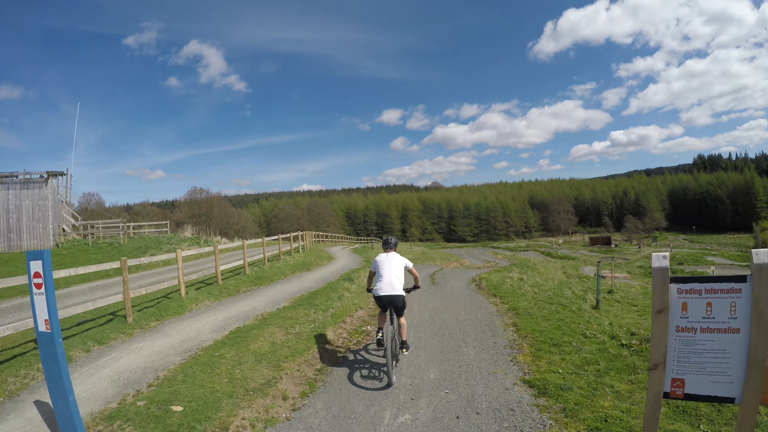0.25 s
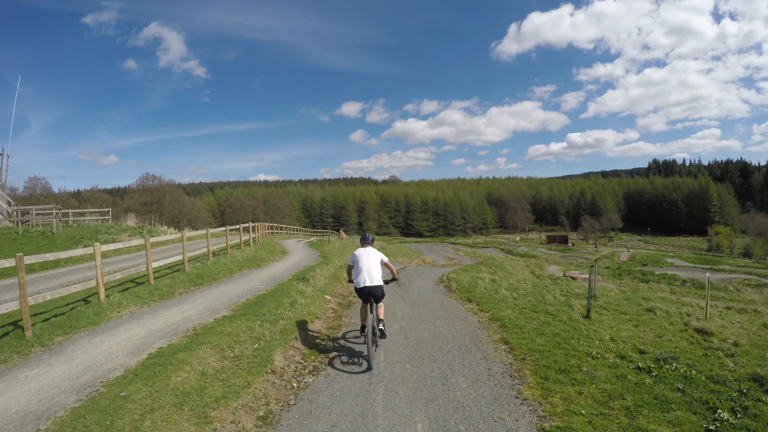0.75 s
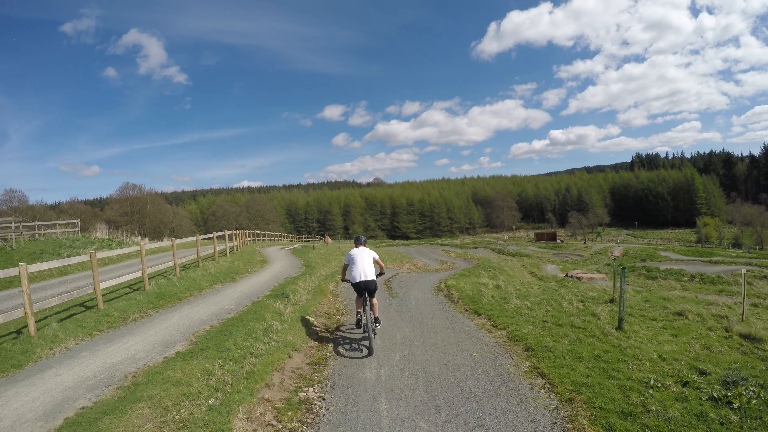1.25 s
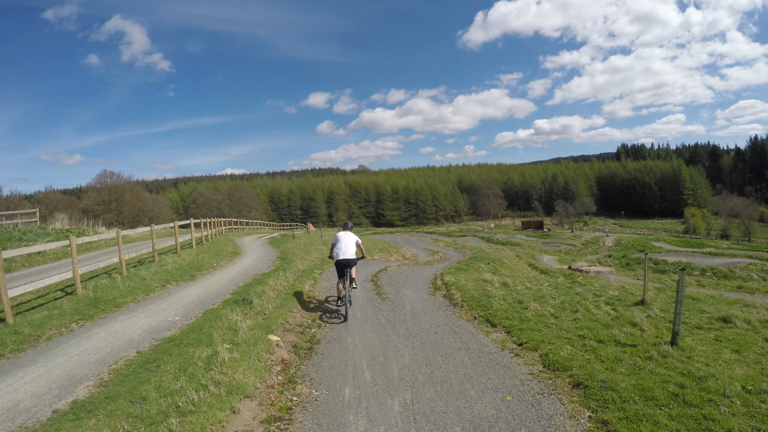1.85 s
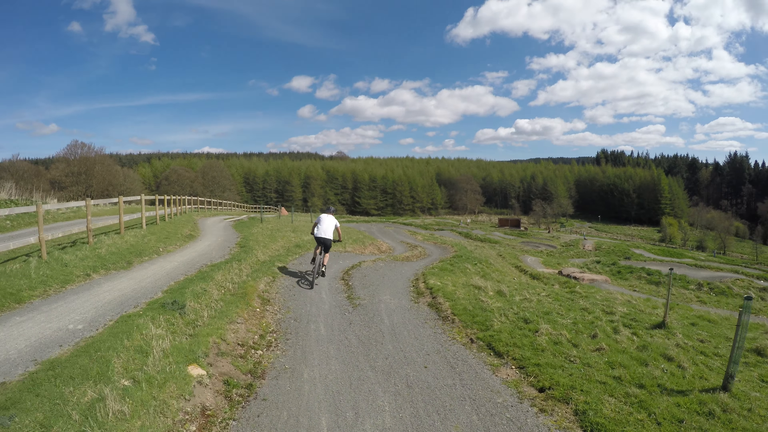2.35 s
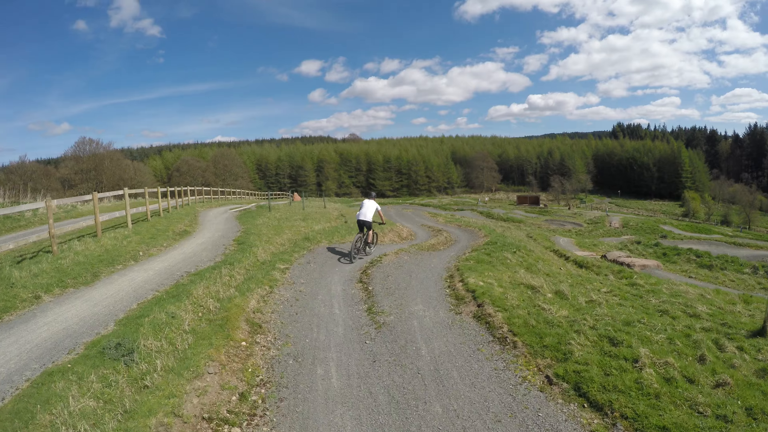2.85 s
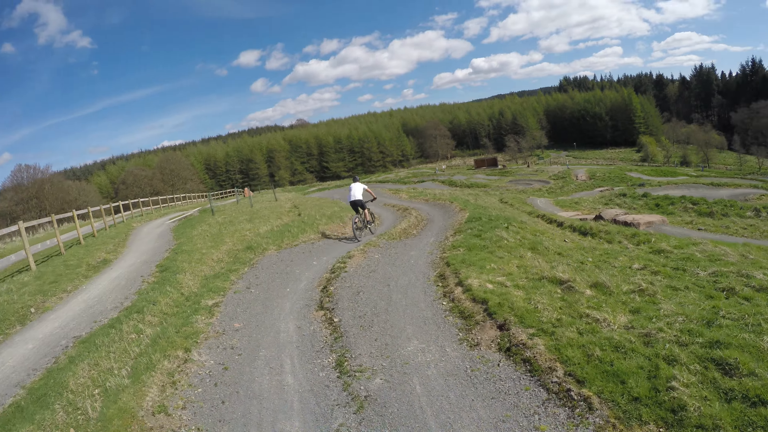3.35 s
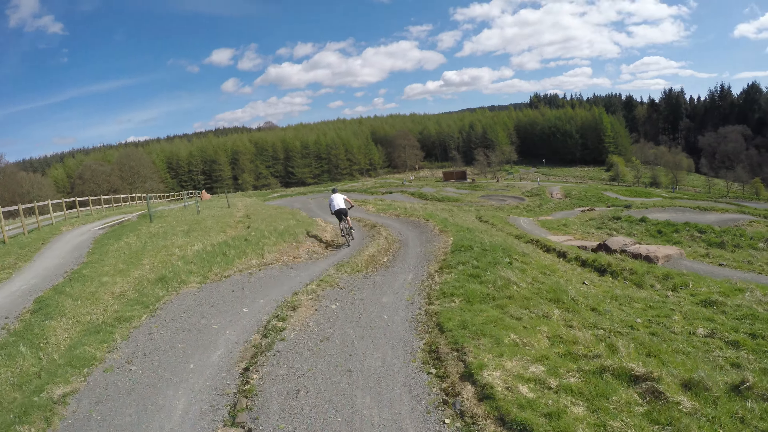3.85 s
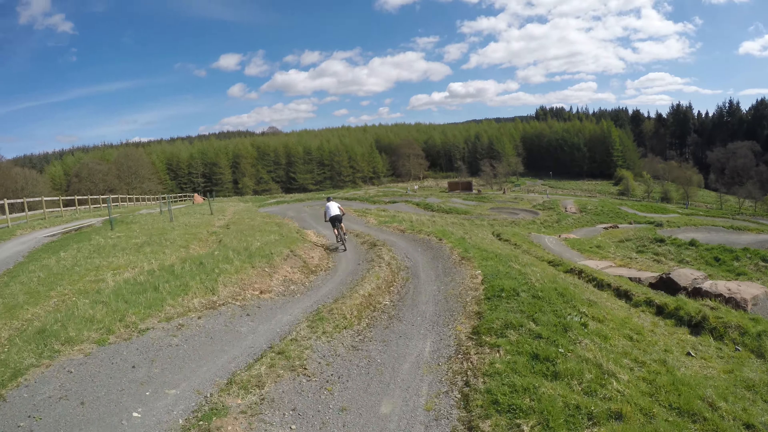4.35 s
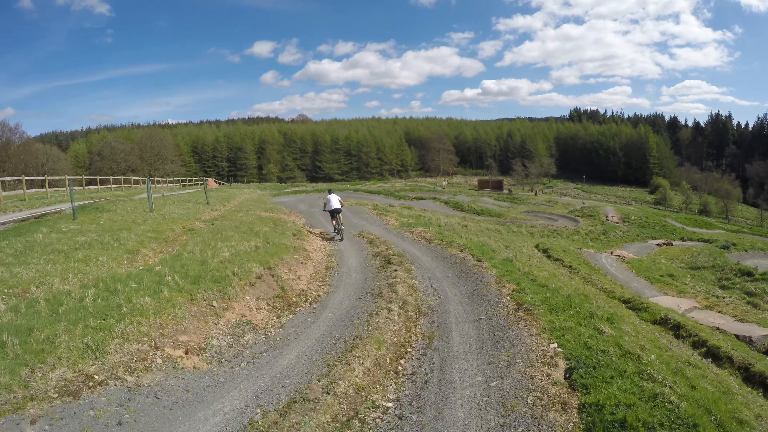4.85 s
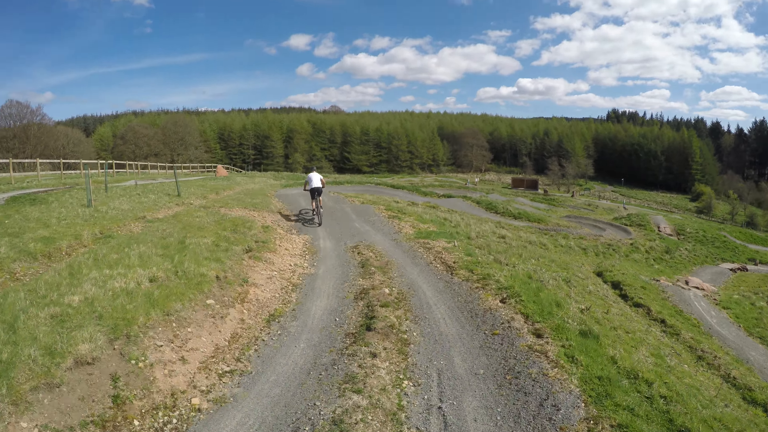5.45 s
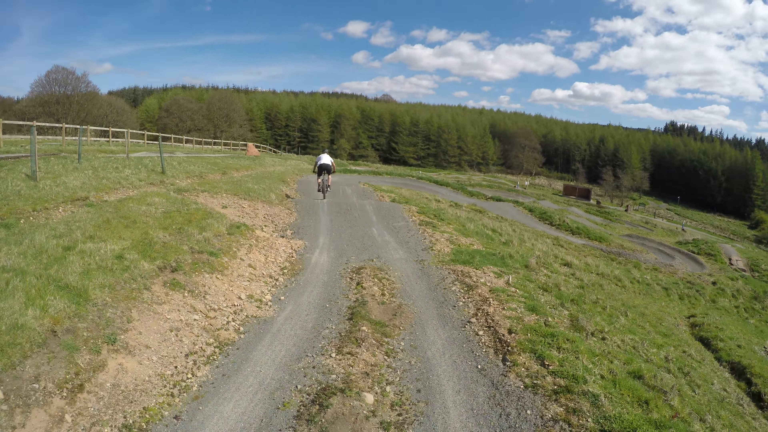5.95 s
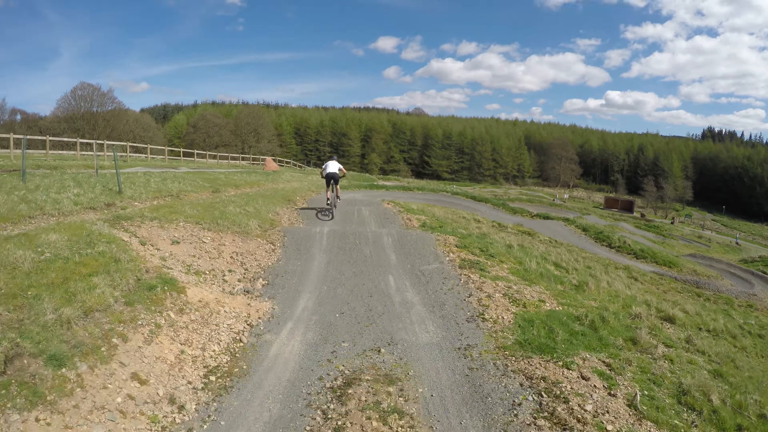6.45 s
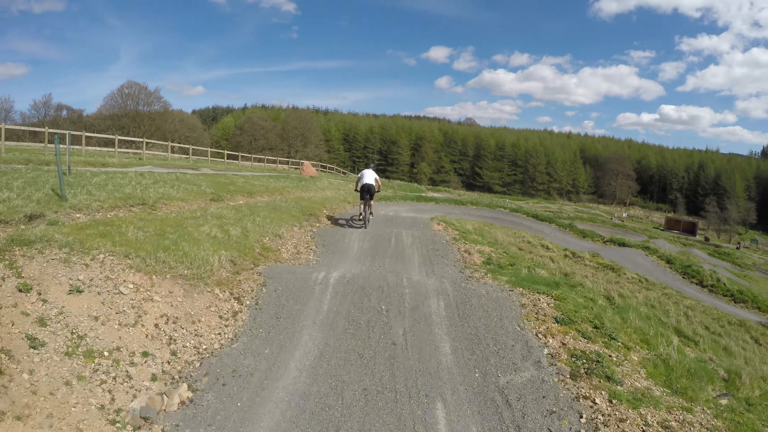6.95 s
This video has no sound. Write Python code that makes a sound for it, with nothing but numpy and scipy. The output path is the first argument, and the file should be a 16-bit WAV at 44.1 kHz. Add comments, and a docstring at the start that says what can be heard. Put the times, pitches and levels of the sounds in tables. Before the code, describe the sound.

A mountain bike rolls over loose gravel with steady crunching, sharp stone pops and metal clicks as wind buffeting grows ever stronger.

```python
"""A mountain bike rolls down a gravel trail, heard by a cased microphone on the rider.
From the start, shaped noise and random pops make gravel, resonators drum as tyres, and slow noise is head wind.
Large stones pop from 0.3 s; a gear lever and other metal click from 3.4 s as ticks with rattling noise.
The frame takes knocks from 3.8 to 5.7 s, rung by short jolts; narrow noise squeaks very high from 5.5 s,
while the wind buffets ever harder towards the end."""
import sys
import numpy as np
from scipy import signal
from scipy.io import wavfile
from scipy.ndimage import uniform_filter1d

SR = 44100
rng = np.random.default_rng(int(sys.argv[2]) if len(sys.argv) > 2 else 0)


def wrap_up_sound(samples):
    """Save the sound to the file named by the first command line argument, as 16-bit audio."""
    columns = np.atleast_2d(samples).T
    # keep every value between -1 and 1, then stretch to whole-number steps
    tamed = np.clip(columns, -1, 1)
    steps = np.round(tamed * 32767).astype(np.int16)
    wavfile.write(sys.argv[1], SR, steps)


N = 317856


def gain_of(db):
    """Decibels to a factor."""
    return 10 ** (np.asarray(db) / 20)


def evened(x):
    """Scaled to rms 1."""
    return x / np.sqrt(np.mean(x ** 2) + 1e-20)


def curves(rows):
    """Every column of a time table, interpolated per sample."""
    s, *columns = np.transpose(rows)
    return [np.interp(np.arange(N) / SR, s, c) for c in columns]


def coloured(x, points):
    """Minimum-phase filter to a spectrum (phase follows from the log gain), then rms 1."""
    f, db = np.transpose(points)
    hz = abs(np.fft.fftfreq(16384, 1 / SR))
    log_gain = np.log(gain_of(np.interp(np.log(hz + 1), np.log(f + 1), db)))
    response = np.exp(np.conj(signal.hilbert(log_gain)))
    taps = np.fft.ifft(response).real[:8192]
    return evened(signal.oaconvolve(x, taps)[:len(x)])


def resonate(x, hz, width_hz):
    """One resonance: shift hz down to zero, smooth with one pole, shift back."""
    turn = np.exp(2j * np.pi * np.cumsum(hz * np.ones(len(x))) / SR)
    r = np.exp(-np.pi * width_hz / SR)
    return 2 * (turn * signal.lfilter([1 - r], [1, -r], x / turn)).real


def lumps(hz):
    """Noise low-passed at hz, rms 1: a slow random level."""
    lowpass = signal.butter(2, hz, fs=SR, output="sos")
    return evened(signal.sosfilt(lowpass, rng.standard_normal(N)))


def add(mix, s, sound):
    """Mixes a sound in at s seconds."""
    part = mix[round(s * SR):][:len(sound)]
    part += sound[:len(part)]


def pop(hz, cycles):
    """A stone snapping free: soft quick rise, a few dying cycles, peak 1."""
    n = np.arange(500)
    u = n * hz / (SR * cycles)
    wave = u ** 2 * np.exp(-5 * u) * np.sin(2 * np.pi * hz * n / SR)
    return wave / abs(wave).max()


def hits(per_s, spread_db):
    """Random clicks of either sign, a few of them large."""
    size_db = spread_db * np.minimum(rng.exponential(1, N), 5)
    size = gain_of(size_db) * rng.choice([-1., 1.], N)
    return size * (rng.random(N) < per_s / SR)


# rolling levels, also used by tyres(): (time [s], crackle [dB], tyre drumming [dB], fine grit [dB])
ROLL = [(0.0, -49.5, -49, -60.5), (0.5, -51, -50, -59), (1.5, -48.5, -49.5, -56.5), (1.9, -47, -48, -58),
        (2.3, -46.5, -48.5, -55), (2.6, -49.5, -47, -56.5), (3.1, -44, -47.5, -58.5),
        (3.6, -46, -43.5, -61.5), (4.2, -45, -43.5, -58), (5.1, -46, -42, -57.5),
        (5.55, -51.5, -42.5, -59.5), (6.3, -51, -40, -60.5), (6.7, -48.5, -40.5, -60.5),
        (6.83, -52, -39, -64.5), (6.97, -46.5, -42.5, -58), (7.21, -42.5, -40, -58.5)]
# spectrum of stones heard through the case: (frequency [Hz], gain [dB])
CRACKLE_SPECTRUM = [(500, -32), (1100, -16.5), (1600, 9.5), (2050, 10), (2300, 10), (2650, 12), (3200, 1),
                    (4000, -45), (5200, -48), (12000, -110)]
# spectrum of the dull crunch: (frequency [Hz], gain [dB])
CRUNCH_SPECTRUM = [(500, -37), (700, 0.5), (830, 1.5), (930, -2), (1040, 1), (1300, 0), (1700, -16),
                   (4000, -75), (16000, -120)]
# spectrum of the fine grit: (frequency [Hz], gain [dB])
GRIT_SPECTRUM = [(2060, -12.5), (3500, 0.5), (4030, -4), (4620, -0.5), (5110, -5.5), (5910, -8.5),
                 (7060, -23), (8500, -36), (11000, -69), (18700, -120)]
# crunch level at -45 dB crackle and -44 dB drumming; dB per dB of each
CRUNCH_DB, CRUNCH_PER_CRACKLE, CRUNCH_PER_DRUM = -50.5, 0.38, 0.54


def gravel():
    """Stones of many sizes pop in clumps over a noise bed of countless small ones: dull, bright and fine."""
    crackle_db, drum_db, grit_db = curves(ROLL)
    crunch_db = CRUNCH_DB + CRUNCH_PER_CRACKLE * (crackle_db + 45) + CRUNCH_PER_DRUM * (drum_db + 44)
    clumps = gain_of(3.1 * lumps(22) + 1.1 * lumps(120))
    pops = np.zeros(N)
    for hz in np.geomspace(600, 7000, 14):
        grain = pop(hz, 1.29)
        grain = grain / np.linalg.norm(grain) * np.sqrt(hz)
        pops += signal.oaconvolve(hits(170 * clumps, 2.61), grain)[:N]
    pops = evened(pops)
    bed = rng.standard_normal(N) * clumps ** 0.14
    crackle = gain_of(crackle_db) * coloured(pops + 0.58 * bed, CRACKLE_SPECTRUM)
    crunch = gain_of(crunch_db) * coloured(pops + 0.5 * bed, CRUNCH_SPECTRUM)
    grit = gain_of(grit_db) * coloured(pops + 1.4 * bed, GRIT_SPECTRUM)
    return crackle + crunch + grit


CHIPS_DB, CHIPS_PER_DB = -41.5, 1.05  # chip level for a -32 dB stone; dB per dB of the stone


def stone(db, hz):
    """A wide-band pop at the stone's pitch, then smaller chips breaking off at random."""
    t = np.arange(1500) / SR
    chips = rng.choice([-1., 1.], len(t)) * (rng.random(len(t)) < 600 / SR) * (t > 0.001)
    chip_gain = gain_of(CHIPS_DB + CHIPS_PER_DB * (db + 32)) * np.exp(-t / 0.008)
    blows = gain_of(db) * (t == 0) + chips * chip_gain
    snap = np.convolve(blows, pop(hz, 1.9) + 0.6 * pop(2300, 1.7))
    case = signal.butter(6, 3800, fs=SR, output="sos")  # the case dulls the top
    return signal.sosfilt(case, snap)


# single large stones: (time [s], level [dB], pitch [Hz])
STONES = [(0.2997, -30.5, 2450), (0.837, -28, 2680), (0.848, -29, 2560), (0.907, -22, 2620),
          (0.9977, -32, 2630), (1.169, -34, 1630), (1.203, -28.5, 1530), (1.2163, -30, 1680),
          (1.326, -30, 2220), (1.4944, -32.5, 2770), (1.641, -34, 1820), (1.683, -29.5, 2580),
          (1.958, -30, 2460), (2.028, -32, 1810), (2.058, -25.5, 2230), (2.145, -29.5, 2340),
          (2.208, -30, 1830), (2.226, -32, 1810), (2.3219, -28, 1840), (2.3413, -28, 1590),
          (2.367, -31, 1710), (2.423, -31, 2380), (2.773, -34.5, 1820), (3.016, -26, 2060),
          (3.1446, -35, 1760), (3.165, -30, 2540), (3.251, -30.5, 2520), (3.365, -29, 2060),
          (3.373, -24, 1970), (3.434, -31, 2190), (3.464, -30, 2110), (3.501, -27.5, 2200),
          (3.547, -29, 2110), (3.552, -30, 2180), (3.649, -39, 1920), (3.6565, -24.5, 1750),
          (3.705, -19.5, 2320), (3.757, -29, 2300), (3.767, -31, 1210), (3.802, -28.5, 2420),
          (3.928, -34, 1800), (3.9732, -25.5, 2620), (3.999, -33, 1060), (4.011, -24, 2460),
          (4.071, -26, 1520), (4.1053, -28, 2540), (4.115, -34, 2460), (4.282, -31, 2470),
          (4.369, -29, 2520), (4.4042, -24, 2240), (4.499, -31, 2200), (4.615, -32, 2050),
          (4.716, -31.5, 1690), (4.7494, -25.5, 1990), (4.79, -25, 2440), (4.993, -25.5, 1250),
          (5.008, -27, 2080), (5.045, -31, 2110), (5.063, -32, 1870), (5.123, -29, 2430),
          (5.147, -25.5, 2360), (5.277, -26.5, 1830), (5.2959, -28, 1140), (5.338, -29.5, 2440),
          (5.463, -32, 790), (5.4837, -30, 820), (5.5155, -26, 1650), (5.69, -23, 1180), (5.692, -31, 2780),
          (5.791, -25, 1240), (5.9659, -29, 1800), (5.992, -30, 1020), (6.0487, -28, 1820),
          (6.3103, -34, 1120), (6.403, -32, 900), (6.61, -27, 1070), (6.775, -29.5, 2240),
          (6.9757, -25.5, 1930), (7.094, -29, 880)]


def stones():
    """Large stones snap free one by one, each with its own pitch."""
    out = np.zeros(N)
    for s, db, hz in STONES:
        add(out, s, stone(db, hz))
    return out


# fine grit flicked against the frame: (time [s], level [dB])
FLICKS = [(0.354, -36), (0.8806, -38), (2.8542, -36), (3.809, -43), (4.126, -42), (5.7488, -37)]


def flicks():
    """Grit strikes the frame: a high pop that lasts several cycles, plus a weaker lower one."""
    out = np.zeros(N)
    for s, db in FLICKS:
        add(out, s, gain_of(db) * (pop(4560, 5.6) + 0.44 * pop(2300, 2.2)))
    return out


# air and casing modes of the tyre: (frequency [Hz], width [Hz], level [dB])
TYRE_MODES = [(170.6, 39, -3.5), (263.4, 32.6, 4.5), (342, 87, 3), (391, 39, -4.5), (432, 22.4, -1.5),
              (535, 86, -9.5)]
RIM_HZ = 607


def ring(x):
    """The wheel's modes, each filtered twice so that the gaps stay dark; the rim swings against the tyre."""
    tyre = np.zeros(len(x))
    for hz, width_hz, db in TYRE_MODES:
        mode = resonate(resonate(x, hz, width_hz), hz, 4 * width_hz)
        tyre += gain_of(db) * mode / np.sqrt(width_hz)
    rim = resonate(resonate(x, RIM_HZ, 25), RIM_HZ, 80)
    return tyre - gain_of(-19) * rim


# knocks and their bounces, also used by knocks():
# (time [s], peak [dB], body frequency [Hz], change in drumming after it [dB])
KNOCKS = [(3.777, -24, 390, 11), (3.786, -21, 263, 5), (4.0, -23.5, 338, 16), (4.017, -28, 270, -6),
          (4.036, -28, 266, -1), (5.6894, -27, 480, 10.5)]
SHUDDER_S = 0.039  # decay of the drumming change after a knock


def tyres():
    """Rough ground excites the wheel's modes and the casing; knocks briefly change the drumming level."""
    _, drum_db, _ = curves(ROLL)
    fade = np.exp(-np.arange(SR // 2) / (SHUDDER_S * SR))
    for s, _, _, shudder_db in KNOCKS:
        add(drum_db, s, shudder_db * fade)
    drum_db = uniform_filter1d(drum_db, size=120)  # level moves over a few ms
    ground = evened(hits(500, 1.1)) + 1.17 * rng.standard_normal(N)
    drone = resonate(resonate(rng.standard_normal(N), 330, 300), 380, 210)  # the casing's broad body
    return gain_of(drum_db) * evened(evened(ring(ground)) + 0.89 * evened(drone))


FRAME_WIDTH_HZ, JOLT_S = 34, 0.00028


def knocks():
    """A short smooth jolt rings the frame, the wheel and a broad clack at once."""
    out, t = np.zeros(N), np.arange(8000) / SR
    jolt = np.exp(-(t / JOLT_S - np.pi) ** 2)
    rim_clack = resonate(resonate(jolt, RIM_HZ, 30), RIM_HZ, 220)
    broad_clack = resonate(resonate(jolt, 540, 460), 790, 810)
    clack = evened(rim_clack + 0.37 * broad_clack)
    wheel = evened(ring(jolt))
    for s, db, hz, _ in KNOCKS:
        frame = evened(resonate(resonate(jolt, hz, FRAME_WIDTH_HZ), hz, 140))
        knock = frame + 0.55 * wheel + 0.75 * clack
        add(out, s, gain_of(db) * knock / abs(knock).max())
    return out


# bright metal clicks: (time [s], level [dB], rattle offset [dB], gain above 11 kHz [dB], rebound share [1])
CLICKS = [(3.3635, -31, -11, 0, .2), (3.4743, -35, -12, 2, .3), (3.5586, -31, -14, 3, 0.13),
          (3.6842, -37.5, -6, 1.5, 0.61), (3.7762, -51, 5, -13, .1), (3.9987, -47, 0, -8, .2),
          (5.486, -44, -10, -12, .2), (5.623, -49, -19, 5, .2), (6.253, -43.5, -5, 6, .2)]
# metal spectrum: (frequency [Hz], gain [dB])
METAL_SPECTRUM = [(2060, 6), (3500, 4), (4330, -3.5), (5660, 2), (6160, -4.5), (8760, -11), (11000, -16),
                  (12500, -19), (14700, -6), (15600, -19), (16200, -37)]
RATTLE_T60_S, REBOUND_S, REBOUND_HZ = 0.055, 0.0059, 5400


def clicks():
    """A sharp noise tick, a ringing rebound, and small parts that rattle on in tiny ticks."""
    out, t = np.zeros(N), np.arange(6000) / SR
    tick = (1 - np.exp(-t / 0.00055)) * np.exp(-t / 0.0015) * 2
    low = signal.butter(4, 11000, "low", fs=SR, output="sos")
    high = signal.butter(4, 11000, "high", fs=SR, output="sos")
    for s, db, rattle_db, bright_db, share in CLICKS:
        noise, other, chatter = rng.standard_normal((3, len(t)))
        ticks = gain_of(2.7 * evened(uniform_filter1d(chatter, size=60)))
        decay = gain_of(rattle_db - 4 - 60 * (t / RATTLE_T60_S) ** 2)
        rattle = np.minimum(t / 0.0033, 1) * ticks * decay
        ringing = evened(resonate(resonate(other, REBOUND_HZ, 1200), REBOUND_HZ, 1600))
        rebound = share * np.exp(-((t - REBOUND_S) / 0.00083) ** 2) * ringing
        metal = coloured(noise, METAL_SPECTRUM)
        metal = signal.sosfilt(low, metal) + gain_of(bright_db) * signal.sosfilt(high, metal)
        add(out, s, gain_of(db) * (metal * (tick + rattle) + rebound))
    return out


# squeaks: (time [s], level [dB], start frequency [Hz], width [Hz], half of duration [s])
SQUEAKS = [(5.455, -60, 11600, 450, .036), (5.488, -63, 12500, 450, .03), (5.52, -55, 11900, 550, .03),
           (5.793, -41, 12650, 950, .046), (5.83, -56, 11550, 450, .034), (5.893, -65, 11750, 450, .028)]
SAG_HZ = 250  # pitch drop per half duration


def squeaks():
    """Short gritty squeaks: a narrow noise band that sags in pitch, starts quickly and dies away."""
    out = np.zeros(N)
    for s, db, start_hz, width_hz, half_s in SQUEAKS:
        u = np.linspace(0, 2, round(2 * half_s * SR))
        turn = np.exp(2j * np.pi * np.cumsum(start_hz - SAG_HZ * u) / SR)
        a, b = rng.standard_normal((2, len(u)))
        lowpass = signal.butter(8, width_hz / 2, fs=SR, output="sos")
        band = signal.sosfilt(lowpass, a + 1j * b)
        swell = 4 * u ** 1.4 * np.exp(-(u / 0.59) ** 2)
        add(out, s, gain_of(db) * evened((band * turn).real) * swell)
    return out


def steadied(x, seconds, share):
    """Irons out part of a noise's own swells, so that the gusts set its rhythm."""
    swell = np.sqrt(abs(uniform_filter1d(x ** 2, round(seconds * SR))) + 0.022)
    return evened(x / swell ** share)


# head wind between the gusts: (time [s], buffeting level [dB])
WIND = [(0.0, -46), (0.55, -49.5), (0.9, -54), (1.05, -43), (1.9, -40), (2.25, -47), (3.05, -38.5),
        (3.9, -43.5), (4.45, -30.5), (5.05, -33.5), (5.25, -30), (5.8, -26.5), (6.3, -26), (6.75, -23.5),
        (7.1, -25), (7.21, -23.5)]
# gusts: (peak time [s], full width at 1/e [s], buffeting swell [dB], rumble swell [dB])
GUSTS = [(0.725, 0.072, 2, 9), (0.963, 0.044, 8, 5), (1.108, 0.14, 18, 8), (1.314, 0.081, 9.5, 3),
         (2.505, 0.051, 16.5, -3), (2.742, 0.048, 7, 2), (2.926, 0.53, 7.5, 7), (4.54, 0.068, 9.5, 1),
         (5.738, 0.039, -8, 5), (5.917, 0.058, 1, 6), (6.075, 0.046, 7, 2.5), (6.3, 0.03, 1, 8),
         (6.553, 0.12, 6, 6), (6.648, 0.062, 3.5, 1), (6.816, 0.045, 1.5, 2), (6.934, 0.066, 7.5, 5)]
# spectrum of the slow buffeting: (frequency [Hz], gain [dB])
BUFFET_SPECTRUM = [(8, -24), (24, 8), (40, 14.5), (60, 2.5), (90, -3.5), (140, -73), (1000, -130)]
# spectrum of the faster rumble: (frequency [Hz], gain [dB])
RUMBLE_SPECTRUM = [(30, -49.5), (55, -4.5), (70, -3), (110, -10), (170, -19), (300, -25), (600, -44.5),
                   (6000, -130)]
RUMBLE_DB, RUMBLE_GROWTH = -35, 1.41  # rumble level at -31.5 dB wind; dB per dB of wind


def wind():
    """Eddies at the microphone port: slow buffeting, and a lumpy rumble that grows quicker with the wind."""
    wind_db, t = curves(WIND)[0], np.arange(N) / SR
    buffet_db = wind_db
    rumble_db = RUMBLE_DB + RUMBLE_GROWTH * (wind_db + 31.5)
    for s, width_s, swell_db, rumble_swell_db in GUSTS:
        gust = np.exp(-(2 * (t - s) / width_s) ** 2)
        buffet_db = buffet_db + swell_db * gust
        rumble_db = rumble_db + rumble_swell_db * gust
    buffet = steadied(coloured(rng.standard_normal(N), BUFFET_SPECTRUM), 0.2, 0.58)
    rumble = steadied(coloured(rng.standard_normal(N), RUMBLE_SPECTRUM), 0.047, 0.75)
    rumble = evened(rumble * gain_of(2.3 * lumps(8.1)))
    return gain_of(buffet_db) * buffet + gain_of(rumble_db) * rumble


def scene():
    """Everything reaches one microphone; the last 200 samples fade out."""
    ending = np.minimum(np.arange(N)[::-1] / 200, 1)
    air = wind()
    ground = gravel() + stones() + flicks()
    bike = tyres() + knocks() + clicks() + squeaks()
    return ((ground + bike + air) * ending)[None]


# hiss spectrum: (frequency [Hz], gain [dB])
HISS_SPECTRUM = [(3000, -34), (5500, -6.5), (7000, -7.5), (9000, -10.5), (12000, -12.5), (13500, -12.5),
                 (15100, -14), (15500, -35)]
HISS_DB, EDGE_HZ = -71, 16200


def record(dry):
    """The case weakens one narrow band; then the microphone's own hiss and the band limit."""
    cased = dry - 0.5 * resonate(dry[0], 715, 68)
    hiss = gain_of(HISS_DB) * coloured(rng.standard_normal(N), HISS_SPECTRUM)
    padded = np.pad(cased + hiss, ((0, 0), (255, 255)), "reflect", reflect_type="odd")
    lowpass = signal.firwin(511, EDGE_HZ, window=("kaiser", 9), fs=SR)
    return signal.oaconvolve(padded, lowpass[None], "valid")


dry = scene()
out = record(dry)
wrap_up_sound(out)
```